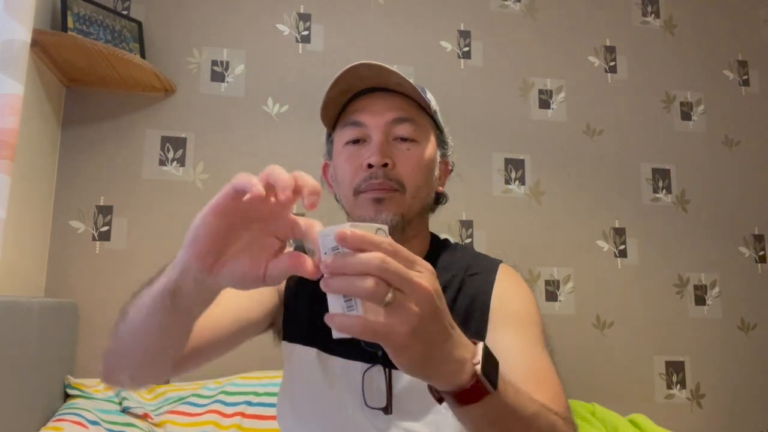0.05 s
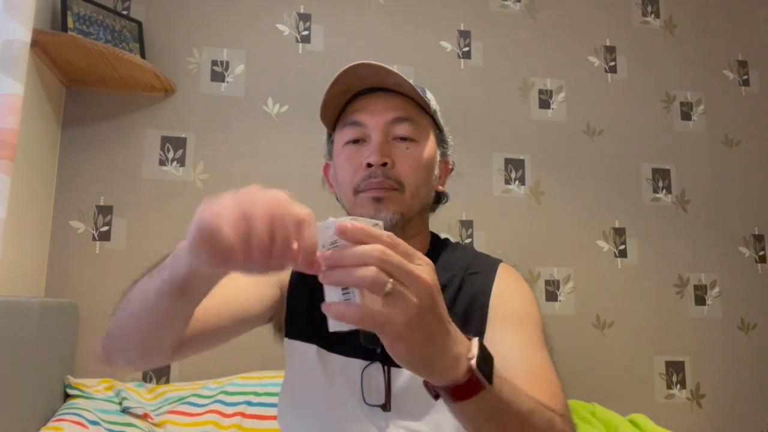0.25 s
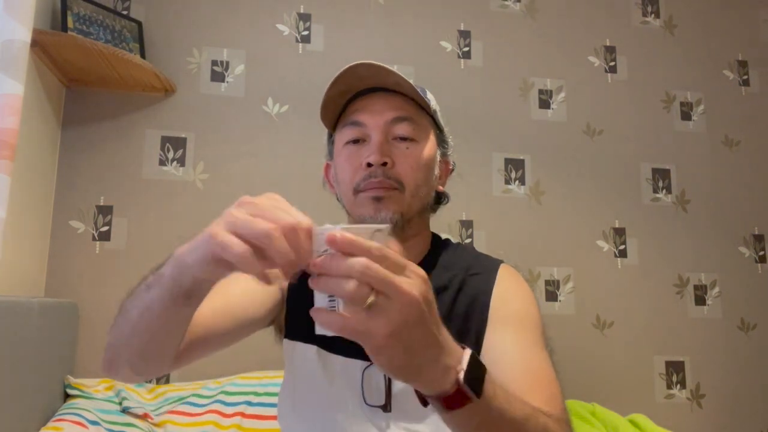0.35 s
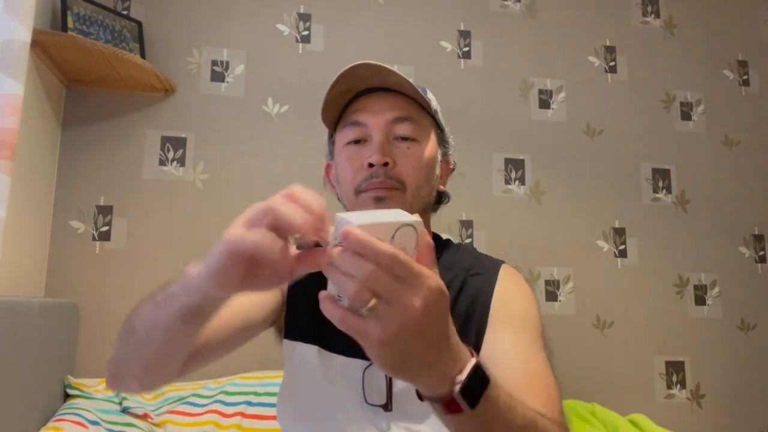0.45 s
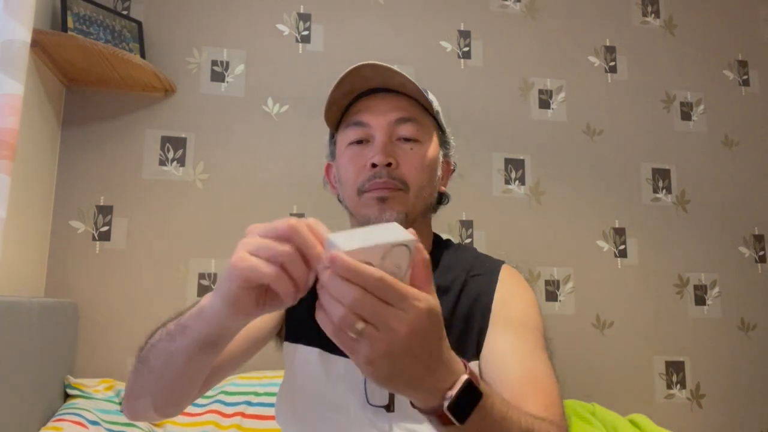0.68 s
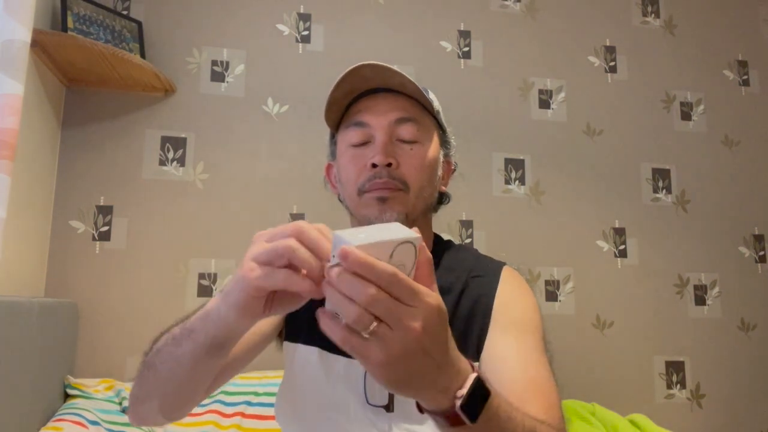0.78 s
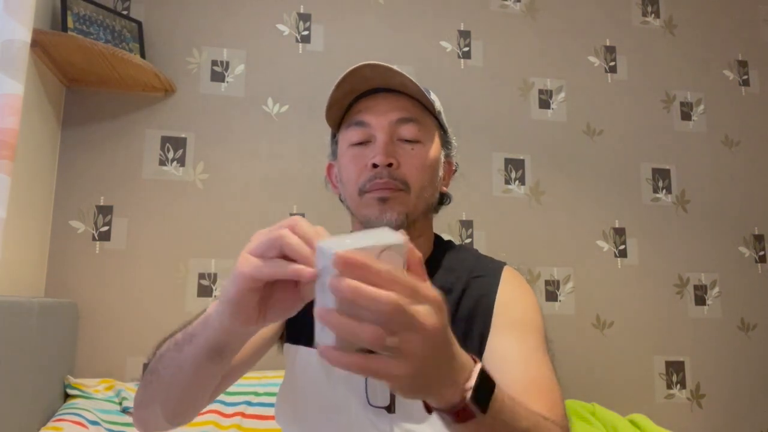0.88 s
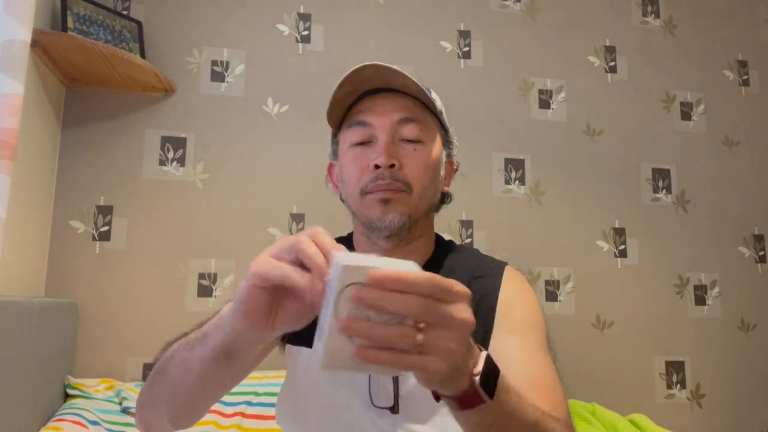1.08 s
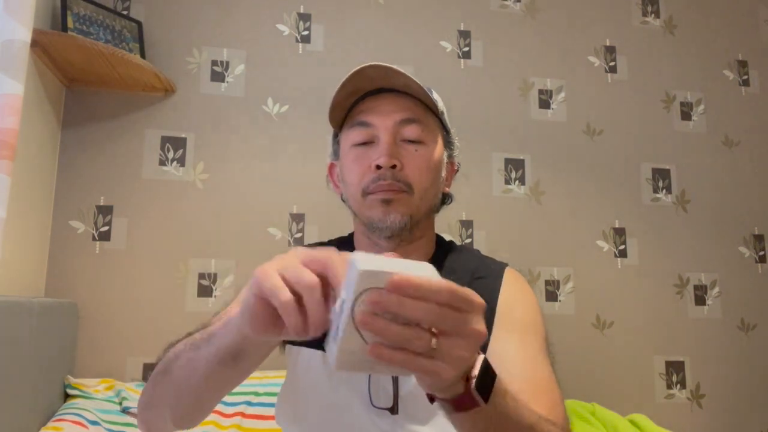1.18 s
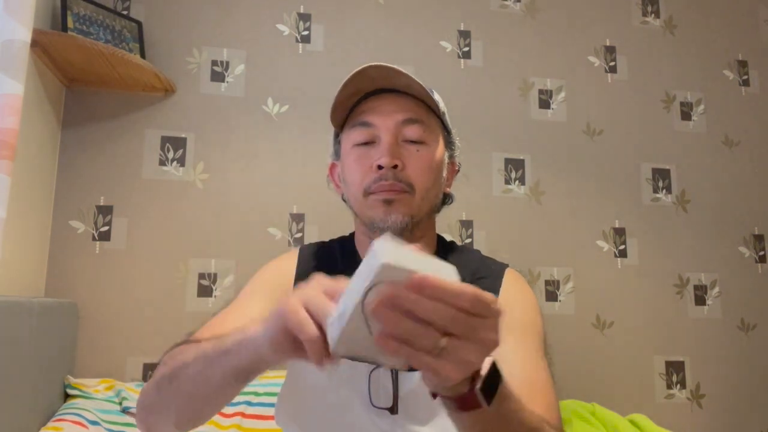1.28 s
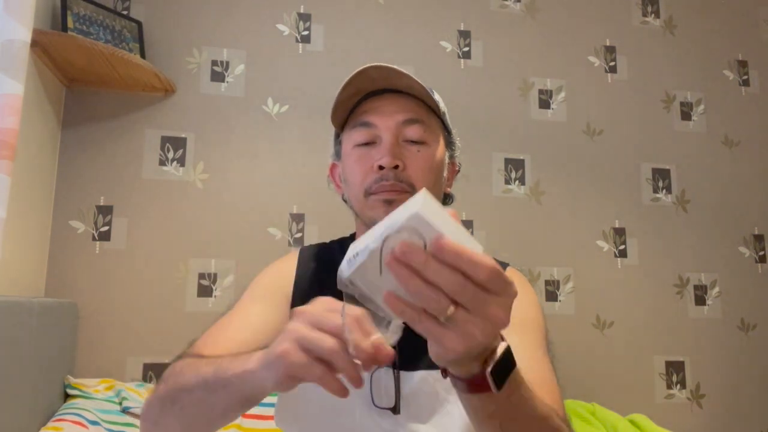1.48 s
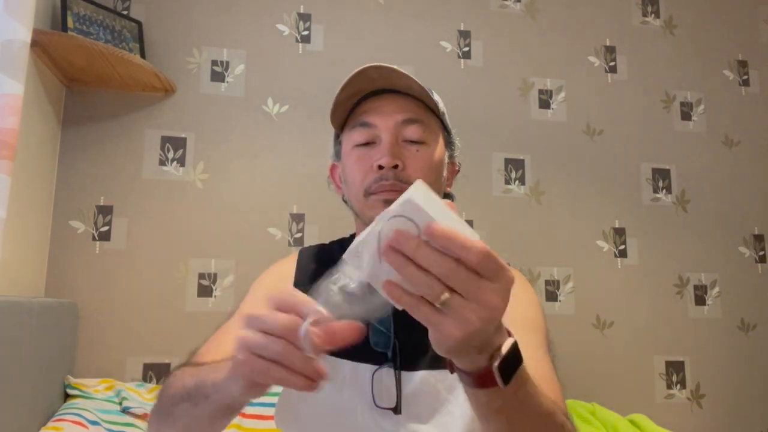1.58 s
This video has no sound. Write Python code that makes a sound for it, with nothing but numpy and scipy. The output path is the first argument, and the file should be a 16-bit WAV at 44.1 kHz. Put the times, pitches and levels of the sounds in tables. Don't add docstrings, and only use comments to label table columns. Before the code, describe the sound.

Small card box being handled and opened: a loud burst of tearing film, then crinkling and knocks

```python
import sys
import numpy as np
from scipy import signal
from scipy.fft import rfft, irfft, next_fast_len
from scipy.io import wavfile

SR = 44100
rng = np.random.default_rng(int(sys.argv[2]) if len(sys.argv) > 2 else 0)


def log_audio(samples):
    frames = np.atleast_2d(samples).T
    limited = np.clip(frames, -1, 1)
    pcm = np.round(limited * 32767).astype(np.int16)
    wavfile.write(sys.argv[1], SR, pcm)


def volts_from_decibels(level):
    exponent = np.asarray(level, float) / 20
    return 10 ** exponent


N = 72765

# start in seconds, peak in dB, tilt in dB per octave, share into the box in dB.
SNAPS = [(0.0884, -13, -3.5, -38), (0.1235, -29, 6, -36), (0.1583, -18.5, -3.5, -23.5),
         (0.1778, -45, 5, -27), (0.206, -5, 7, -46), (0.221, 11, 0.0, -31), (0.2321, 8.5, 6.5, -42.5),
         (0.2493, 5, 2.5, -58), (0.2527, -37, 2, -47), (0.3777, -36, 0, -12), (0.4953, -19, -6, -32),
         (0.5263, -29.5, 0, -13), (0.5654, -22, 3, -32), (0.6713, 10, 11, -55), (0.7499, -18, 4, -29.5),
         (0.8848, -10.5, 3, -30), (1.012, -26, -3.5, -31), (1.0568, -45, -13, -35), (1.0716, -11, -5, -69),
         (1.1505, -24, -1, -21.5), (1.1677, -13, 0, -25.5), (1.1773, -16, -18, -25.5),
         (1.2031, -17, -12, -31), (1.2316, -19, -10, -38), (1.2412, -11, -4, -22.5),
         (1.3558, -22.5, -33, -44), (1.379, -16, 19, -20.5), (1.4147, -14, 1, -31.5),
         (1.4918, -22.5, -10, -28), (1.5787, -13, 17, -40)]
# start in seconds, peak in dB.
TICKS = [(.2205, 3), (.2209, 2), (.2217, -1), (.2319, -4), (.6711, -4), (.6726, -5), (.7499, -24),
         (.858, -27), (1.408, -25), (1.5215, -21), (1.556, -27), (1.591, -29)]
# start in seconds, peak in dB, pitch in Hz.
PINGS = [
    (0.2212, -5.5, 6350),
    (.2212, -13, 4140),
    (0.2219, -17, 2140),
    (0.2223, -16, 1327),
    (0.6709, -24, 3250),
    (0.6713, -20.5, 8150),
    (.0886, -44, 7800),
    (1.0709, -33, 4200),
]
# start in seconds, level in dB, fade in ms, tilt in dB per octave.
CRACKLES = [(.0002, -37, 15, -1), (0.087, -30, 2.4, 4), (.1232, -37, 1.6, 4), (.2165, -33, 3.5, 5),
            (0.2204, -16.5, 4.4, 2.5), (.2235, -25, 19, -1), (0.2303, -22.5, 4.2, 2),
            (0.2516, -21, 5.2, 1.5), (.2625, -32.5, 11, 1), (0.3764, -58, 4.9, -4), (0.671, -23.5, 3, 0.5),
            (0.6782, -37.5, 18, 0.5), (0.7495, -36, 4.8, 3), (1.0555, -50, 2, 6), (1.1475, -38, 5, 2),
            (1.164, -33, 3, 2), (1.166, -30.5, 6.7, 6), (1.2024, -25, 4.2, 3.5), (1.2306, -29, 4.5, -1.5),
            (1.239, -30, 11, 0), (1.274, -42, 6, 6), (1.3124, -42, 5.5, -5), (1.3514, -36, 3, 7),
            (1.3543, -37, 7.4, 1), (1.379, -38, 11, 7), (1.4546, -43, 6.6, -2)]
# start in seconds, length in seconds, level in dB, tilt in dB per octave.
STROKES = [(-.02, 0.034, -40.5, -0.5), (0.031, 0.058, -58.5, -0.5), (0.083, 0.31, -50, 0.5),
           (0.247, 0.0069, -48, -4), (.30, 0.013, -89, -11), (0.387, 0.064, -58, -3),
           (0.465, 0.018, -54, 1), (0.491, 0.088, -47.5, -2), (0.666, 0.02, -35, 1),
           (0.731, 0.055, -46.5, 0), (0.825, 0.055, -48.5, 6), (0.885, 0.042, -52, -3.5),
           (1.01, 0.028, -52, -2), (1.055, 0.1, -48.5, 1.5), (1.146, 0.018, -39.5, 4),
           (1.161, 0.056, -34.5, 0), (1.228, 0.016, -29.5, 4.5), (1.263, 0.054, -38.5, -2.5),
           (1.311, 0.019, -46, -5.5), (1.339, 0.054, -41.5, 9), (1.467, 0.045, -45, 2.5),
           (1.494, 0.085, -46, -1.5), (1.554, 0.031, -49, 4), (1.598, .06, -58, -3)]
# frequency in Hz, density in dB per Hz.
CRINKLE_COLOUR = [(150, -5), (700, -12), (1500, -6), (4000, -0.5), (7500, 4.5), (12000, -4), (15000, -3),
                  (17000, -47)]
# start in seconds, length in seconds, level in dB.
NAILS = [
    (0.21, 0.0048, -31),
    (0.506, 0.017, -50),
    (0.844, 0.04, -50),
    (1.03, 0.038, -53),
    (1.487, 0.023, -52),
]
# start in seconds, peak in dB, hollow pitch in Hz, contact in ms.
KNOCKS = [(0.001, -35.5, 515, 12), (0.002, -38, 820, 5.3), (0.057, -40, 488, 3.2),
          (0.165, -29.5, 543, 0.92), (0.2205, -18, 615, 1.14), (0.273, -55, 510, 2.5),
          (0.38, -39, 544, 3.3), (0.472, -32, 625, 1.33), (0.529, -40, 590, 1.2), (0.547, -40.5, 473, 2.8),
          (0.754, -42, 516, 2.8), (0.802, -41.5, 526, 1.9), (0.844, -43, 660, 1.14),
          (0.887, -35.5, 464, 0.68), (0.927, -31, 511, 4.4), (1.033, -44.5, 467, 1), (1.119, -41, 520, 8.6),
          (1.151, -24, 497, 0.77), (1.189, -31.5, 505, 2.9), (1.244, -31.5, 485, 1), (1.27, -28.5, 546, 5),
          (1.305, -23, 584, 2.2), (1.313, -16.5, 519.6, 7.2), (1.344, -30, 571, 1.6),
          (1.393, -31, 518, 4.6), (1.443, -44, 565, 5.6), (1.503, -37, 870, 9.8)]
# frequency in Hz, level in dB, decay time T60 in seconds.
PANEL_MODES = [(321, -23, 0.075), (505.6, -3.5, 0.056), (629, -4.5, 0.047), (852, -3, 0.038),
               (1238, 0, 0.011), (2107, -15.5, 0.18), (2430, -9.5, 0.17)]
# centre in seconds, level in dB, frequency in Hz.
PUFFS = [
    (0.229, -56, 115),
    (0.678, -59, 128),
    (0.941, -61, 64),
    (1.038, -66, 65),
    (1.25, -55.5, 74),
    (1.329, -50.5, 59),
    (1.392, -60.5, 86),
]
# frequency in Hz, decay time T60 in seconds, level in dB.
ROOM = [(150, 0.33, -2), (487, 0.26, 2.5), (1430, 0.29, 1), (4140, 0.16, 0), (10800, 0.18, -5.5)]
# frequency in Hz, density in dB per Hz.
AIR_COLOUR = [(25, -14), (48, 1), (150, -8.5), (500, -10.5), (1500, -19.5), (5000, -15), (15000, -19)]
# delay in seconds, gain as a factor.
PORT_ECHOES = [(.0003, -0.37), (.0007, 0.24), (.0012, -0.64)]
# lower edge in Hz, upper edge in Hz.
MID_GAPS = [(8400, 9500), (13750, 15100)]
# lower edge in Hz, upper edge in Hz.
SIDE_GAPS = [(11000, 12300)]

SNAP_S, SNAP_GAIN_DB, TICK_TILT_DB = .00025, -3, 3
REBOUND_S, REBOUND_DB = .0014, -13
PING_CYCLES = 10.8
GRAINS_PER_S, GRAIN_SPREAD_DB, FLICKER_DB, FLICKER_HZ = 8000, 3, 1.2, 90
STROKE_INTO_BOX_DB, STROKE_ATTACK_S, STROKE_RELEASE_S = -9.5, .0043, .023
CRACKLE_ATTACK_S = .0006
NAIL_HZ, NAIL_T60_S = 4200, .002
HOLLOW_T60_S, KNOCK_GAIN_DB, PANEL_DB = .057, -8, -13
PARTNER_RATIO, PARTNER_DB = 1.223, -4.5
PUFF_S, ROOM_GAP_S, AIR_DB = .018, .0028, -63.5
LOW_LAG_S, PAN_DB = .00007, -.5
SPLIT_HZ, SPLIT_WIDTH_HZ, HIGH_LEAD_S, HIGH_ALIKE = 7700, 600, .000174, .98
GAP_DB, GAP_EDGE_HZ = 22, 300
LOW_CUT_HZ, TOP_HZ = 42, 16400


def at_hz(points, hz, column=1):
    points = np.array(points)
    return np.interp(np.log(np.maximum(hz, 1)), np.log(points[:, 0]), points[:, column])


def coloured(x, points):
    hz = np.fft.rfftfreq(x.shape[-1], 1 / SR)
    return irfft(rfft(x) * volts_from_decibels(at_hz(points, hz)), x.shape[-1])


def tilted(x, tilt_db):
    hz = np.fft.rfftfreq(N, 1 / SR)
    return irfft(rfft(x) * volts_from_decibels(tilt_db * np.log2(np.maximum(hz, 300) / 5000)), N)


def rms_one(x):
    return x / np.sqrt(np.mean(x ** 2) + 1e-20)


def highpass(x, hz):
    return signal.sosfilt(signal.butter(2, hz, "high", fs=SR, output="sos"), x)


def ring(force, hz, t60):
    radius = volts_from_decibels(-60 / (t60 * SR))
    angle = 2 * np.pi * hz / SR
    return signal.lfilter([0, np.sin(angle)], [1, -2 * radius * np.cos(angle), radius ** 2], force + 1e-18)


def add(out, s, sound):
    i = int(s * SR)
    out[i:i + len(sound)] += sound[:len(out) - i]


def snaps():
    out, force = np.zeros(N), np.zeros(N)
    t = np.arange(-128, 128) / SR
    octaves = np.log2(np.clip(np.fft.rfftfreq(len(t), 1 / SR), 2500, 12000) / 6000)
    rows = list(SNAPS) + [(s, db, TICK_TILT_DB, -60) for s, db in TICKS]
    for s, db, tilt_db, box_db in rows:
        white = rng.standard_normal(len(t))
        crack = (t == 0) * 4 + white * np.exp(-np.abs(t) / SNAP_S)
        burst = irfft(rfft(crack) * volts_from_decibels(tilt_db * octaves), len(t))
        burst = volts_from_decibels(db + SNAP_GAIN_DB) * burst / np.abs(burst).max()
        add(out, s + t[0] + .0003, burst)
        add(out, s + t[0] + REBOUND_S, volts_from_decibels(REBOUND_DB) * burst[::-1])
        add(force, s + REBOUND_S, volts_from_decibels(db + box_db) * np.hanning(12) / 6)
    band = signal.butter(2, [2400, 15000], "band", fs=SR, output="sos")
    return signal.sosfilt(band, out) + panels(force)


def pings():
    out = np.zeros(N)
    click = np.arange(600) == 0
    for s, db, hz in PINGS:
        add(out, s, volts_from_decibels(db) * ring(click, hz, PING_CYCLES / hz))
    return out


def friction_grains():
    slow = signal.butter(2, FLICKER_HZ, fs=SR, output="sos")
    flicker = rms_one(signal.sosfilt(slow, rng.standard_normal(N)))
    sizes = volts_from_decibels(GRAIN_SPREAD_DB * np.minimum(rng.exponential(1, N), 4)) * rng.choice([-1, 1], N)
    slips = rng.random(N) < GRAINS_PER_S / SR
    return rms_one(sizes * slips * volts_from_decibels(FLICKER_DB * flicker))


def rubbed_card(grains):
    return rms_one(coloured(grains, CRINKLE_COLOUR) + volts_from_decibels(STROKE_INTO_BOX_DB - 36) * panels(grains))


def crackles(rub):
    out, t = np.zeros(N), np.arange(N) / SR
    for s, db, fade_ms, tilt_db in CRACKLES:
        fade = np.exp(-np.maximum(t - s, 0) / (fade_ms / 1000))
        shape = np.clip((t - s) / CRACKLE_ATTACK_S, 0, 1) * fade
        out += volts_from_decibels(db) * shape * tilted(rub, tilt_db)[::-1]
    return out


def stroke_shape(s, length):
    t = np.arange(N) / SR
    rise = np.clip((t - s) / STROKE_ATTACK_S, 0, 1)
    return rise * np.exp(-np.maximum(t - s - length, 0) / STROKE_RELEASE_S)


def strokes(rub):
    out = np.zeros(N)
    for s, length, db, tilt_db in STROKES:
        out += volts_from_decibels(db) * stroke_shape(s, length) * tilted(rub, tilt_db)
    return out


def nails(grains):
    nail = rms_one(ring(grains[::-1], NAIL_HZ, NAIL_T60_S))
    return nail * sum(volts_from_decibels(db) * stroke_shape(s, length) for s, length, db in NAILS)


def knocks():
    out, force = np.zeros(N), np.zeros(N)
    t = np.arange(8000) / SR
    for s, db, hz, contact_ms in KNOCKS:
        white = rng.standard_normal(len(t))
        touch = white * np.exp(-t / (contact_ms / 1000)) * np.minimum(t / .003, 1)
        partner = ring(touch, PARTNER_RATIO * hz, HOLLOW_T60_S / 2)
        note = ring(touch, hz, HOLLOW_T60_S) - volts_from_decibels(PARTNER_DB) * partner
        scale = volts_from_decibels(db + KNOCK_GAIN_DB) / np.abs(note).max()
        add(out, s, scale * note)
        add(force, s, scale * touch)
    return out + volts_from_decibels(PANEL_DB) * signal.lfilter([.15], [1, -.85], panels(force))


def panels(force):
    out = 0
    for k, (hz, db, t60) in enumerate(PANEL_MODES):
        out = out + (-1) ** k * volts_from_decibels(db) * ring(force, hz, t60)
    return out


def puffs():
    out, t = np.zeros(N), np.arange(N) / SR
    for s, db, hz in PUFFS:
        out += volts_from_decibels(db) * np.exp(-((t - s) / PUFF_S) ** 2) * np.sin(2 * np.pi * hz * (t - s))
    return out


def room(x):
    t, tail = np.arange(SR // 2) / SR, 0
    white = rng.standard_normal((2, len(t)))
    for low in 70 * 2 ** np.arange(8.0):
        octave = signal.butter(2, [low, 2 * low], "band", fs=SR, output="sos")
        t60 = at_hz(ROOM, 1.34 * low)
        decay = volts_from_decibels(-60 * t / t60) / np.sqrt(t60 * SR / 14)
        tail = tail + volts_from_decibels(at_hz(ROOM, 1.4 * low, column=2)) * signal.sosfilt(octave, white) * decay
    tail = tail * np.clip(t / ROOM_GAP_S - .5, 0, 1)
    return signal.fftconvolve(x[None], tail, axes=1)[:, :N]


def still_air():
    air = volts_from_decibels(AIR_DB) * rms_one(coloured(rng.standard_normal((3, N)), AIR_COLOUR))
    return .9 * air[0] + .4 * air[1:]


def scene():
    grains = friction_grains()
    rub = rubbed_card(grains)
    handling = crackles(rub) + strokes(rub) + nails(grains)
    box = highpass(snaps() + pings() + handling + knocks(), 150)
    n, late = np.arange(N), 0
    for lag, gain in [(LOW_LAG_S, 1)] + list(PORT_ECHOES):
        late = late + gain * np.interp(n - lag * SR, n, box)
    left = late * volts_from_decibels(PAN_DB) * np.std(box) / np.std(late)
    return np.array([left, box]) + room(box) + puffs() + still_air()


def without_gaps(spectrum, hz, gaps):
    depth = sum(np.clip(np.minimum(hz - a, b - hz) / GAP_EDGE_HZ + .5, 0, 1) for a, b in gaps)
    return spectrum * volts_from_decibels(-GAP_DB * depth)


def band_limit(x):
    return signal.sosfilt(signal.butter(12, 21850, fs=SR, output="sos"), x)


def record(dry):
    size = next_fast_len(N + 512)
    hz = np.fft.rfftfreq(size, 1 / SR)
    left, right = rfft(dry, size)
    share = HIGH_ALIKE / (1 + np.exp(-(hz - SPLIT_HZ) / (SPLIT_WIDTH_HZ / 2)))
    lead = np.exp(2j * np.pi * hz * HIGH_LEAD_S)
    left = share * right * lead + np.sqrt(1 - share ** 2) * left
    mid = without_gaps(left + right, hz, MID_GAPS)
    side = without_gaps(left - right, hz, SIDE_GAPS)
    x = irfft(np.array([mid + side, mid - side]) / 2, size)[:, :N]
    x = x + highpass(np.clip(x, -1, 1) - x, 300)
    x = highpass(x, LOW_CUT_HZ)
    x = signal.sosfilt(signal.cheby2(10, 45, TOP_HZ, fs=SR, output="sos"), x)
    return band_limit(np.clip(x, -1, 1))


dry = scene()
out = record(dry)
log_audio(out)
```